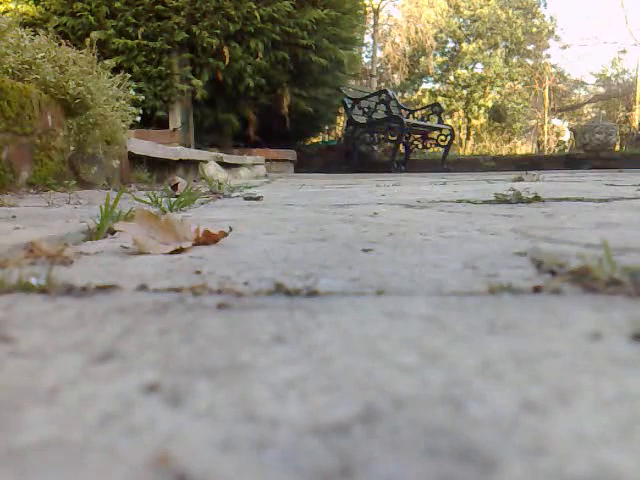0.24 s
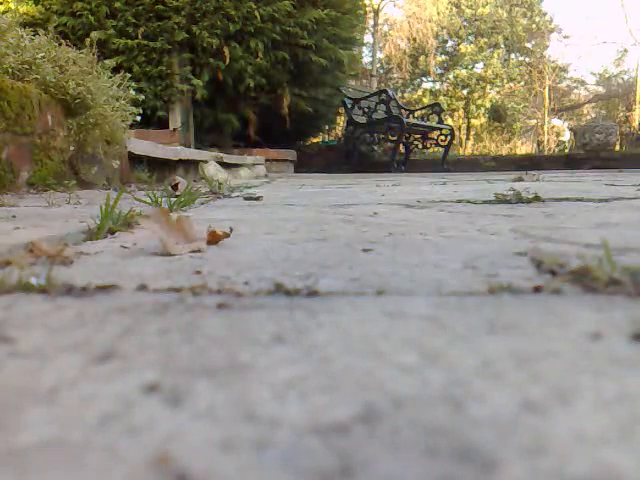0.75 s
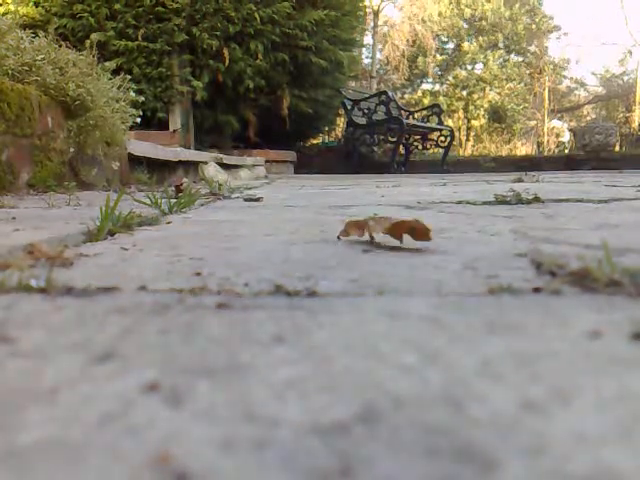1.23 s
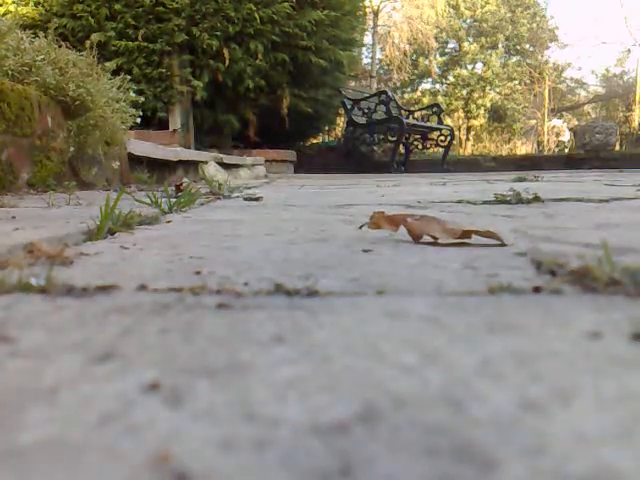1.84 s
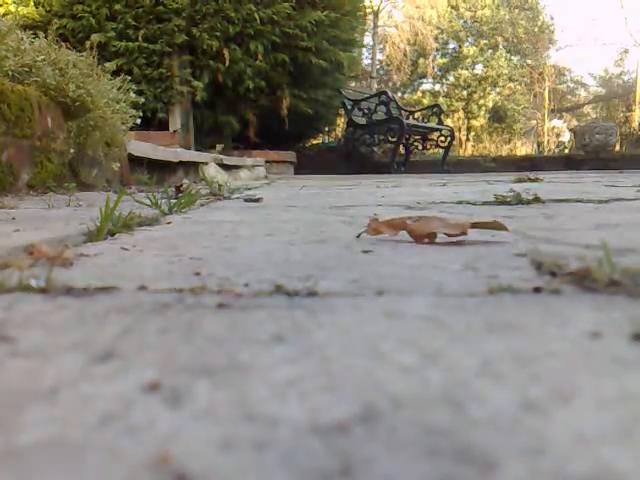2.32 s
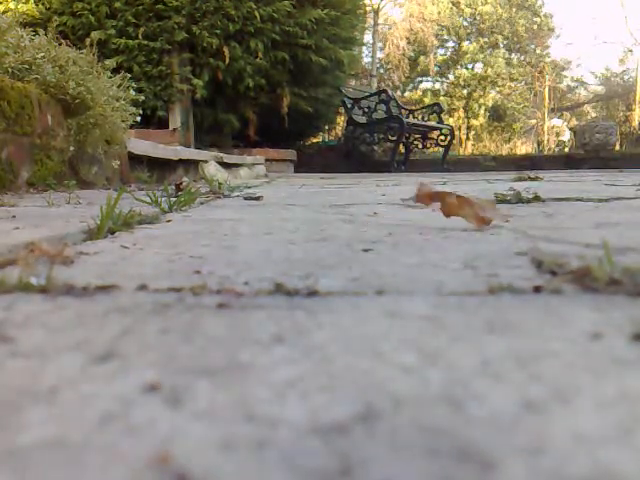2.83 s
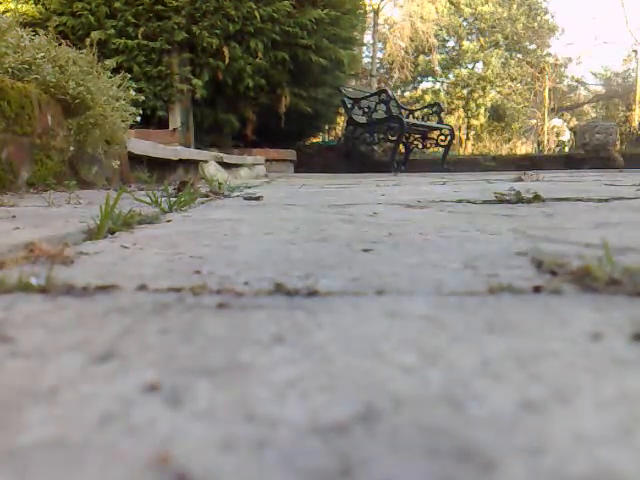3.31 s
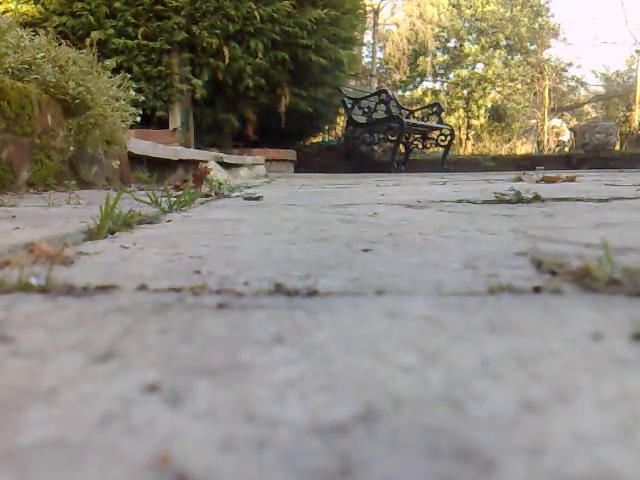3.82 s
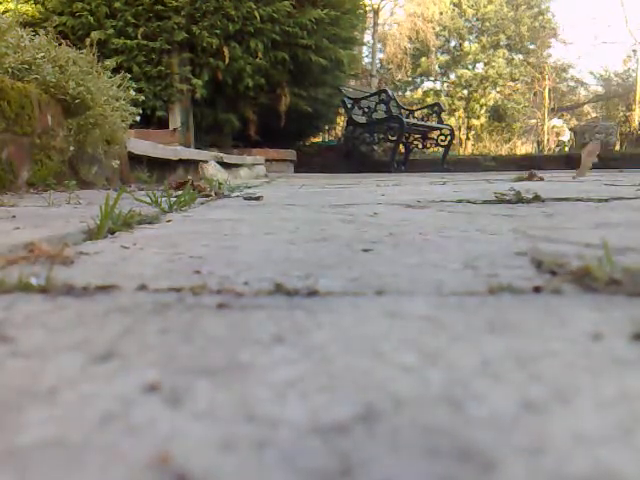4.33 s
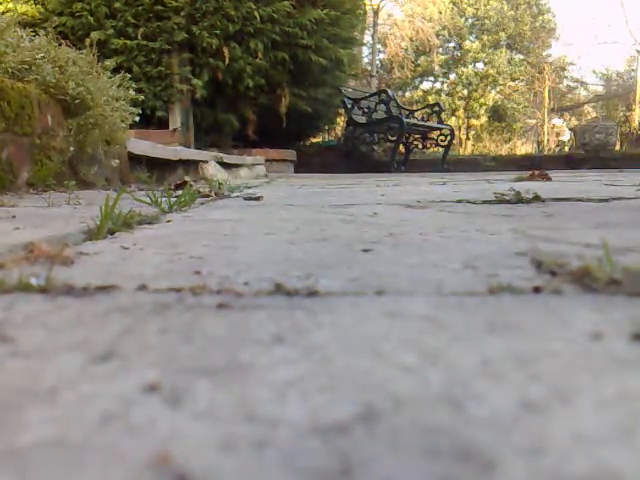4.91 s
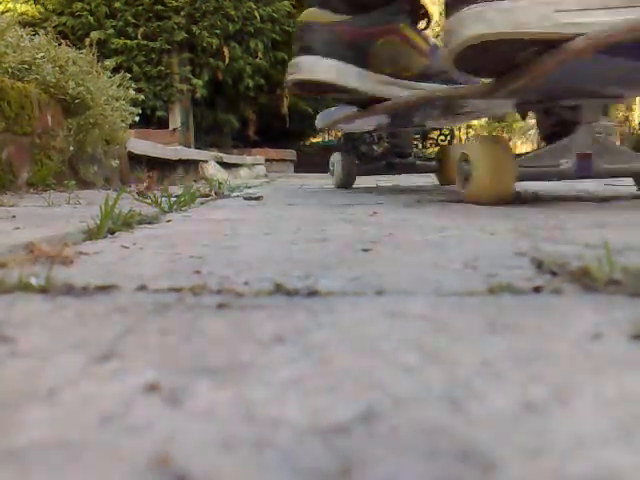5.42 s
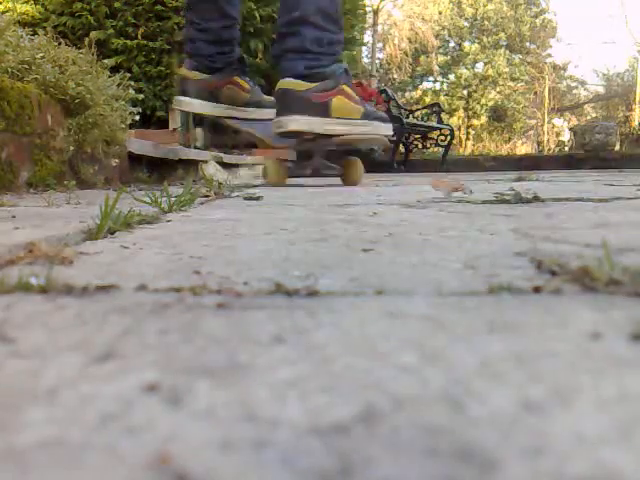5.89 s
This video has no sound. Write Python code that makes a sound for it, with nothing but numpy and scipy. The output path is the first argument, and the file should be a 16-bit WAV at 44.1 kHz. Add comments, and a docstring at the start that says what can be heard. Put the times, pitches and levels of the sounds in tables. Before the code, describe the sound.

Outdoors on paving, hollow wooden deck knocks, shoe scuffs and crunching grit come in uneven bursts, ending with loud rough wheels rolling by.

```python
"""Skateboard on concrete slabs

Shoes scuff, the deck knocks and creaks, wheels grind over grit and joints, grit and dry leaves tick.
Light wind buffets a small microphone; a garden hums far off and a small bird peeps.
Wind, hum and scuffs are shaped noise; deck, rubber and grit are noise or pulses through resonances.
Thumps are damped sines, the peep two hoarse sines; the loudest blows overload the input."""
import sys
import numpy as np
from scipy import signal
from scipy.fft import rfft, irfft, next_fast_len
from scipy.io import wavfile
from scipy.ndimage import map_coordinates

SR = 44100
rng = np.random.default_rng(int(sys.argv[2]) if len(sys.argv) > 2 else 0)


def convert_level_to_amplitude(level_db):
    """Map a level in decibels to its linear amplitude factor."""
    exponent = np.asarray(level_db, float) / 20
    return 10 ** exponent


def to_wav(s):
    """Save 16-bit WAV."""
    ch = np.atleast_2d(s).T  # columns
    pcm = np.round(np.clip(ch, -1, 1) * 32767)  # PCM
    wavfile.write(sys.argv[1], SR, pcm.astype(np.int16))


N = 271215


def unit(x):
    """Scale to rms 1."""
    return x / np.sqrt(np.mean(x ** 2) + 1e-20)


def curves(rows):
    """One value per sample for each column after the time."""
    time_s, *columns = np.transpose(rows)
    return [np.interp(np.arange(N) / SR, time_s, column) for column in columns]


def wobble(rate_hz):
    """Smooth random curve, rate_hz knots a second."""
    knots = rng.standard_normal(int(N * rate_hz / SR) + 4)
    return map_coordinates(knots, [np.arange(N) * rate_hz / SR])


def filtered(x, response):
    """x times a complex response of frequency."""
    size = next_fast_len(N + SR // 2)
    return irfft(rfft(x, size) * response(np.fft.rfftfreq(size, 1 / SR)), size)[:N]


def coloured(x, points):
    """x through a (frequency [Hz], gain [dB]) curve read on a log frequency axis."""
    hz, db = np.transpose(points)
    return filtered(x, lambda f: convert_level_to_amplitude(np.interp(np.log(f + 1), np.log(hz + 1), db)))


def ringing(x, modes):
    """x through parallel resonances of alternating sign."""
    def response(f):
        return sum((-1) ** k * convert_level_to_amplitude(db) * 1j * f * width / (hz * hz - f * f + 1j * f * width)
                   for k, (hz, width, db) in enumerate(modes))
    return filtered(x, response)


def shifting(x, modes, spread_db):
    """Ringing whose modes are struck at ever-changing strengths, as the point of contact moves."""
    return sum((-1) ** k * ringing(convert_level_to_amplitude(spread_db * wobble(30)) * x, [mode])
               for k, mode in enumerate(modes))


def bumps(per_s, spread_db, life_s, bed_db):
    """Noise in sudden bursts of uneven size that die away, over a steady bed."""
    size_db = np.minimum(spread_db * rng.exponential(size=N), 3 * spread_db)
    sizes = (rng.random(N) < per_s / SR) * convert_level_to_amplitude(size_db)
    bursts = signal.lfilter([1], [1, -np.exp(-1 / (life_s * SR))], sizes)
    return unit((unit(bursts) + convert_level_to_amplitude(bed_db)) * rng.standard_normal(N))


# garden hum spectrum: (frequency [Hz], gain [dB])
GARDEN_SPECTRUM = [(40, 6), (85, 1.5), (120, 6.5), (160, -6), (800, -24.5), (3200, -21.5), (6000, -33.5),
                   (16000, -56)]
# background level as recorded, lower after the loud passages: (time [s], level [dB])
BACKGROUND_LEVEL = [(1.0, -42.5), (3.0, -45.5), (4.3, -45.5), (4.95, -44)]


def garden():
    """Far hum: mostly low noise at the background level as recorded."""
    return convert_level_to_amplitude(curves(BACKGROUND_LEVEL)[0]) * unit(coloured(rng.standard_normal(N), GARDEN_SPECTRUM))


# wind spectrum: (frequency [Hz], gain [dB])
BUFFET_SPECTRUM = [(15, -36), (35, 2.5), (80, 2.5), (170, -13), (350, -33), (700, -92)]
# push of the wind on the microphone: (time [s], level [dB])
WIND_LEVEL = [(0, -64), (1.3, -75), (1.85, -35.5), (2.7, -35), (2.95, -67), (3.16, -27.5), (3.72, -36),
              (3.88, -19.5), (3.98, -20), (4.05, -37.5), (4.4, -58.5), (4.75, -37), (5.0, -44), (6.06, -56),
              (6.11, -26)]


def wind():
    """Wind on the microphone: low noise made lumpy by a random level."""
    buffet = convert_level_to_amplitude(4.8 * wobble(17)) * coloured(rng.standard_normal(N), BUFFET_SPECTRUM)
    return convert_level_to_amplitude(curves(WIND_LEVEL)[0]) * unit(buffet)


# bird peep: (time [s], reference pitch [Hz], reference level [dB])
PEEP_TRACK = [(3.87, 8300, -97), (3.9, 8300, -54), (3.945, 7650, -59), (4.0, 7700, -97)]


def bird():
    """Thin whistle and a fainter one below; jittered pitch and level make it hoarse."""
    reference_hz, db = curves(PEEP_TRACK)
    out = np.zeros(N)
    for ratio, level_db in [(0.97, 0), (0.82, -7)]:
        level = convert_level_to_amplitude(db + level_db + 4.6 * wobble(70))
        pitch_hz = ratio * reference_hz + 150 * wobble(300)
        out += level * np.sin(2 * np.pi * np.cumsum(pitch_hz) / SR)
    return out


# grit squeak: (time [s], level [dB])
SQUEAK_LEVEL = [(2.48, -120), (2.5, -62), (2.56, -40), (2.64, -30), (2.74, -35), (2.79, -53), (2.81, -120)]
# squeak resonances: (frequency [Hz], width [Hz], gain [dB])
SQUEAK_MODES = [(3900, 230, -5), (6660, 450, 7)]


def squeak():
    """Grit under a turning wheel: quick slips ring in two narrow bands."""
    slips = bumps(per_s=150, spread_db=5, life_s=.002, bed_db=-8)
    return convert_level_to_amplitude(curves(SQUEAK_LEVEL)[0]) * unit(ringing(slips, SQUEAK_MODES))


# rubber creaking under the rider's weight: (time [s], mean slip rate [Hz], level [dB])
CREAK_TRACK = [(1.65, 300, -61), (1.69, 279.3, -35.5), (1.79, 330, -38), (1.83, 457.4, -30.5),
               (1.88, 301, -40), (1.93, 321, -32.5), (1.98, 283, -39.5), (2.0, 286, -77)]
# rubber resonances: (frequency [Hz], width [Hz], gain [dB])
RUBBER_MODES = [(766, 310, -1), (1980, 800, 3), (3420, 590, 1.5), (5100, 850, -10.5)]


def creak():
    """Rubber sticks and slips at an unsteady rate; each slip is a pulse into its resonances."""
    mean_hz, db = curves(CREAK_TRACK)
    rate_hz = mean_hz * (1 + .04 * wobble(100))
    slips = np.diff(np.floor(np.cumsum(rate_hz) / SR), prepend=0)
    rubbed = slips * convert_level_to_amplitude(2 * rng.standard_normal(N)) + .045 * rng.standard_normal(N)
    return convert_level_to_amplitude(db) * unit(ringing(rubbed, RUBBER_MODES))


# dragged soles: (start [s], rise [s], end [s], centre [Hz], width per filter pass / centre [1], level [dB])
SCUFF_STROKES = [(2.883, 0.021, 2.934, 2640, 2.3, -30), (4.674, 0.0041, 4.7, 7070, 5.9, -21.5),
                 (5.014, 0.0066, 5.062, 4930, 2.1, -12.5)]


def scuffs():
    """Sole dragged over the slab: a held, uneven hiss round one broad band."""
    out, t = np.zeros(N), np.arange(N) / SR
    for start_s, rise_s, end_s, hz, width, db in SCUFF_STROKES:
        fall_start_s = end_s - max(rise_s, .012)
        stroke = np.interp(t, [start_s, start_s + rise_s, fall_start_s, end_s], [0, 1, 1, 0])
        band = [(hz, width * hz, 0)]
        friction = convert_level_to_amplitude(1.55 * wobble(190)) * rng.standard_normal(N)
        out += convert_level_to_amplitude(db) * stroke * unit(ringing(ringing(friction, band), band))
    return out


# whole board on the slab: (time [s], pitch [Hz], envelope peak [dB])
BOARD_THUMPS = [(0.141, 192, -2.5), (0.3923, 195, -4.5), (1.4073, 198, -4), (2.085, 77, -12.5),
                (2.212, 111, -12), (2.371, 180, -6.5), (2.384, 192, -10), (3.198, 83, -15.5),
                (3.3162, 195, -6), (3.331, 70.5, -14), (3.647, 96, -19.5), (4.1097, 205, -5.5),
                (4.194, 198, -14), (5.091, 189, -8), (5.229, 168, 1), (6.081, 60.6, -15)]
THUMP_PEAK_CYCLES = 0.53  # pitch cycles until the envelope peak


def thumps():
    """The board's weight lands: a low swing or two, quickly damped."""
    out, t = np.zeros(N + SR), np.arange(SR // 8) / SR
    for s, hz, db in BOARD_THUMPS:
        u = t * hz / THUMP_PEAK_CYCLES
        envelope = u * np.exp(1 - u)
        out[round(s * SR):][:len(t)] += convert_level_to_amplitude(db) * envelope * np.sin(2 * np.pi * hz * t)
    return out[:N]


# wheels and deck: (time [s], relative level [dB], shake relative to crunch before mixing [dB])
DECK_KNOCKS = [(0.0294, -13.5, -10.5), (0.0775, -23, -1), (0.1412, -22.5, 10.5), (0.3914, -12, 2.5),
               (1.115, -39, 5.5), (1.2187, -20.5, 3), (1.232, -31.5, 2), (1.295, -14.5, 0),
               (1.3477, -8, -3), (1.408, -15, -4.5), (1.443, -21.5, 7.5), (1.486, -24, 2),
               (1.9909, -5, -6.5), (2.0974, -13.5, -17), (2.1248, -9, -12), (2.271, -13, -22),
               (2.287, -8, -1.5), (2.3703, -10, -4.5), (2.456, -8, -15), (2.677, -4.5, -12),
               (2.7205, -9.5, -7.5), (2.7754, -8, 3), (2.792, -13.5, -4.5), (3.045, -8.5, -13),
               (3.2138, -16, 4.5), (3.272, -19.5, -11), (3.3152, -7, -0.5), (3.3882, -16.5, -8.5),
               (3.4194, -9.5, -6), (3.468, -15, -16), (3.489, -24.5, 5), (3.5104, -10, -8.5),
               (3.587, -19.5, -9.5), (3.6142, -20.5, -8.5), (4.1066, -0.5, -5), (4.1197, -3.5, -9),
               (4.1915, -10, -6.5), (4.6655, -5.5, -6.5), (5.4327, -9.5, -2.5), (5.5352, -5, 4),
               (5.718, -12.5, -2.5), (5.915, -15, -5)]
# light ticks, hardly any thud: (time [s], relative level [dB])
LIGHT_TICKS = [(1.211, -22), (0.775, -62), (1.421, -9), (1.505, -13), (1.5259, -12), (1.541, -11.5),
               (1.6635, -23), (1.728, -16.5), (2.076, -18), (2.19, -13.5), (2.5438, -18), (2.7476, -8.5),
               (3.1156, -14.5), (3.2441, -16), (3.3087, -17), (3.3736, -16.5), (3.48, -23), (3.565, -40),
               (3.669, -26), (3.7043, -22.5), (3.7138, -21), (3.8212, -25.5), (3.845, -33), (3.871, -33),
               (4.042, -22.5), (4.3213, -36), (4.415, -35.5), (4.7332, -24.5), (4.798, -24), (5.0886, -5.5),
               (5.1232, -8), (5.1475, -3.5), (5.258, -5), (5.3854, -10.5), (5.9572, -15.5), (6.112, -17)]
KNOCK_CRUNCH_T60_S, TICK_CRUNCH_T60_S = 0.04, 0.043
TICK_SHAKE_DB = -22.5  # relative to crunch before mixing
TICK_THIN = 0.43  # share of the low end missing from a tick's crunch, 0-1


def blows():
    """Every knock and tick as (time s, relative dB, shake dB, crunch t60 s, thinness 0-1)."""
    heavy = [(*row, KNOCK_CRUNCH_T60_S, 0) for row in DECK_KNOCKS]
    light = [(*row, TICK_SHAKE_DB, TICK_CRUNCH_T60_S, TICK_THIN) for row in LIGHT_TICKS]
    return heavy + light


# wooden deck, also in contact: (frequency [Hz], width [Hz], gain [dB])
DECK_MODES = [(115, 55.4, -2), (221, 77.4, 1), (330, 111, -0.5), (544, 184, -2), (763, 138, 0),
              (955, 177, -4), (1344, 205, -5.5), (1708, 280, -8.5), (2364, 530, -18.5)]
# crushed grit, also in contact: (frequency [Hz], gain [dB])
GRIT_SPECTRUM = [(1060, -18), (1800, -4), (5100, -11), (6710, -9.5), (8060, -11), (10500, -6), (12400, -7),
                 (16000, -23.5)]


def knocks():
    """Each blow is a tick, a short crunch of grit and a longer shake of the deck's modes."""
    crunch, shake, t = np.zeros(N + SR), np.zeros(N + SR), np.arange(SR // 4) / SR
    for s, db, shake_db, t60_s, thin in blows():
        noise = rng.standard_normal((2, len(t)))
        at = slice(round(s * SR), round(s * SR) + len(t))
        tick = 0.89 * convert_level_to_amplitude(db - 60 * t / 0.0044)
        crunch[at] += (convert_level_to_amplitude(db - 60 * t / t60_s) + tick) * signal.lfilter([1, -thin], [1], noise[0])
        onset = 1 - np.exp(-t / 0.00096)
        shake[at] += convert_level_to_amplitude(db + shake_db - 60 * t / (1.11 * t60_s)) * onset * noise[1]
    shaken = shifting(shake[:N], DECK_MODES, spread_db=2.2)
    return convert_level_to_amplitude(1.5) * coloured(crunch[:N], GRIT_SPECTRUM) + convert_level_to_amplitude(20.5) * shaken


def deck_rumble(jolts):
    """Low deck modes boom; wheels dropping into pits of the slab add single blunt pushes."""
    boom = unit(shifting(jolts + rng.standard_normal(N), DECK_MODES[:3], spread_db=3.0))
    lumps = unit((rng.random(N) < 130 / SR) * convert_level_to_amplitude(3 * rng.standard_normal(N)))
    pits = [(180, 310, 0)]  # (Hz, width Hz, dB), passed twice
    return unit(boom - 0.96 * unit(ringing(ringing(lumps, pits), pits)))


def deck_rattle(jolts, crackle, rumble_over_rattle_db):
    """Upper deck modes rattle; the heavier the rumble, the duller the rattle."""
    shiver = jolts + .8 * crackle + .5 * rng.standard_normal(N)
    dulling = convert_level_to_amplitude(-0.4 * np.clip(rumble_over_rattle_db, -8, 10))
    middle = shifting(shiver, DECK_MODES[3:6], spread_db=2.2)
    return unit(middle - dulling * shifting(shiver, DECK_MODES[6:], spread_db=2.2))


def grit_hiss(crackle):
    """Grit crackles broadly; the smallest grains snap in a few high bands."""
    fine = bumps(per_s=90, spread_db=6.5, life_s=.001, bed_db=-6)
    snap_modes = [(3810, 680, -0.021), (6710, 640, 0.15), (10850, 3100, -0.89)]  # (Hz, width Hz, dB)
    return unit(unit(coloured(crackle, GRIT_SPECTRUM)) + 0.87 * unit(ringing(fine, snap_modes)))


# how hard wheels and soles bear on the slabs, heard as rattle: (time [s], level [dB])
PRESSURE_LEVEL = [(0, -30), (0.1, -26), (0.13, -39), (0.28, -53), (0.33, -36.5), (0.45, -62.5),
                  (1.04, -55.5), (1.13, -40), (1.27, -29.5), (1.39, -34.5), (1.45, -28.5), (1.55, -33.5),
                  (1.6, -44.5), (1.97, -40), (2.06, -40), (2.3, -26.5), (2.4, -28.5), (2.48, -23.5),
                  (2.62, -23), (2.71, -28.5), (2.8, -22.5), (2.82, -40.5), (2.98, -55.5), (3.19, -58.5),
                  (3.26, -38), (3.55, -40.5), (3.64, -52.5), (4.27, -76.5), (4.62, -55.5), (4.74, -45),
                  (5.0, -54), (5.045, -20), (5.075, -24), (5.14, -14.5), (5.17, -28.5), (5.245, -17),
                  (5.27, -28), (5.51, -22.5), (5.55, -18.5), (5.62, -10.5), (5.65, -25), (5.8, -30),
                  (6.0, -18), (6.06, -18.5), (6.1, -29)]
# deck rumble over rattle: (time [s], relative level [dB])
RUMBLE_OVER_RATTLE = [(0, 4), (1.1, 1.5), (1.33, -7), (1.42, 4), (1.97, -0.5), (2.2, 10), (2.62, 8.5),
                      (2.7, -15), (3.0, 2), (3.19, 17), (3.3, 0.5), (3.64, 0), (3.9, 18.5), (4.2, 23),
                      (4.65, -12), (5.0, 1.5), (5.22, 8), (5.5, 3), (5.6, -10.5), (5.8, 1), (6.0, -6),
                      (6.15, 5)]
# grit hiss over rattle: (time [s], relative level [dB])
HISS_OVER_RATTLE = [(0, -8.5), (0.3, -18.5), (1.13, -11), (1.25, -4), (1.55, -5.5), (1.65, -5.5),
                    (1.97, -24), (2.06, 2), (2.36, -4.5), (2.48, 1), (2.7, 0), (2.98, -15), (3.26, 2),
                    (3.6, -7.5), (4.3, 1.5), (4.74, -6.5), (5.15, -4), (5.33, -9), (5.72, -14), (5.8, -22),
                    (5.95, -17.5)]


def contact():
    """Grains of the concrete jolt wheels and soles: the deck booms and rattles, grit crackles."""
    rattle_db, = curves(PRESSURE_LEVEL)
    rumble_over_db, = curves(RUMBLE_OVER_RATTLE)
    hiss_over_db, = curves(HISS_OVER_RATTLE)
    jolts = bumps(per_s=140, spread_db=3.3, life_s=.004, bed_db=-5)
    crackle = bumps(per_s=130, spread_db=6.5, life_s=.0013, bed_db=-7)
    rumble = convert_level_to_amplitude(rumble_over_db) * deck_rumble(jolts)
    rattle = deck_rattle(jolts, crackle, rumble_over_db)
    hiss = convert_level_to_amplitude(hiss_over_db) * grit_hiss(crackle)
    return convert_level_to_amplitude(rattle_db) * (rumble + rattle + hiss)


def yard(x):
    """Walls and paving return a short dull echo: x convolved with decaying low-passed noise."""
    t = np.arange(SR // 4) / SR
    tail = signal.lfilter([1], [1, -.7], rng.standard_normal(len(t))) * convert_level_to_amplitude(-60 * t / 0.15)
    delayed = np.pad(x, (300, 0))  # samples
    return signal.fftconvolve(delayed, tail / np.linalg.norm(tail))[:N]


def scene():
    """Everything at the microphone."""
    board = squeak() + creak() + scuffs() + thumps() + knocks() + contact()
    return (garden() + wind() + bird() + convert_level_to_amplitude(-20.0) * yard(board) + board)[None]


TREBLE_LIMIT = [(15300, -0.5), (16000, -11), (16900, -44)]


def limit_treble(x):
    return coloured(x, TREBLE_LIMIT)


def low_pass(x):
    """Removes everything above the highest recorded frequency."""
    return signal.sosfilt(signal.butter(12, 16990, fs=SR, output="sos"), x)


def record(dry):
    """Treble limit, then an input that rounds off the loudest peaks."""
    heard = limit_treble(dry[0])[None]
    soft = heard / (1 + np.abs(heard / .75) ** 4) ** (1 / 4)  # ceiling 0.75
    return low_pass(soft)


dry = scene()
out = record(dry)
to_wav(out)
```